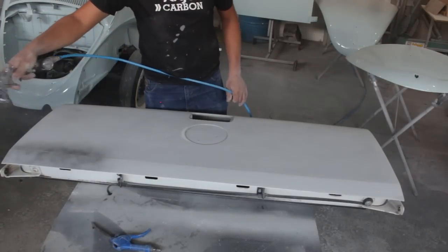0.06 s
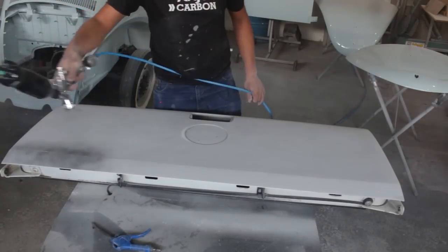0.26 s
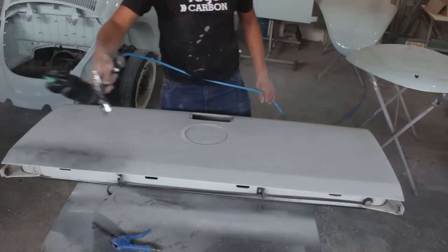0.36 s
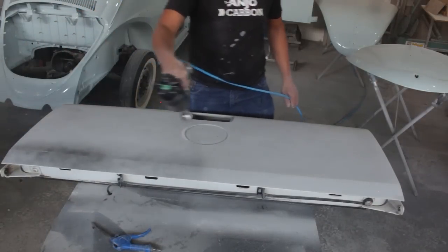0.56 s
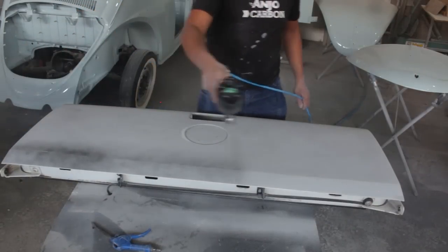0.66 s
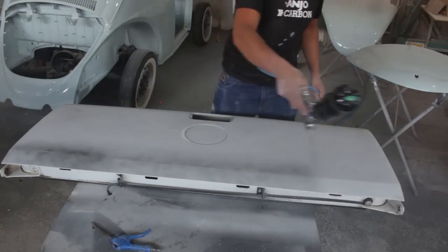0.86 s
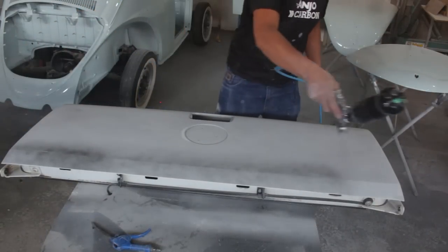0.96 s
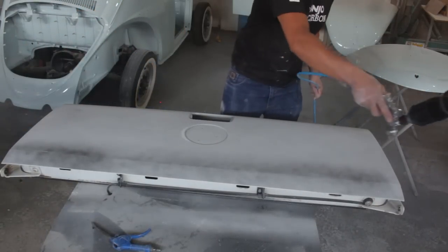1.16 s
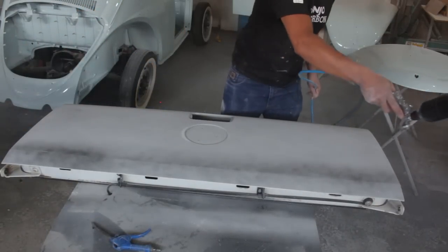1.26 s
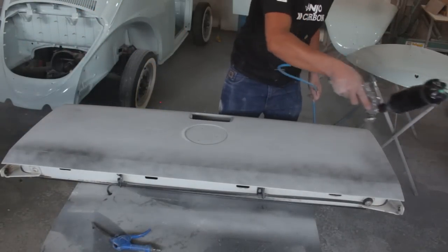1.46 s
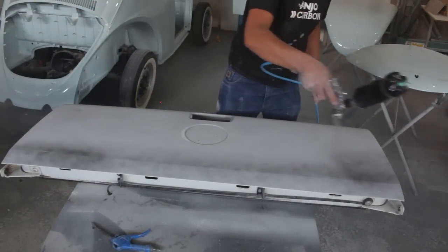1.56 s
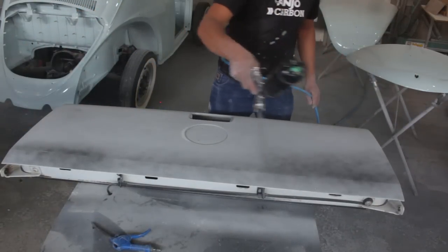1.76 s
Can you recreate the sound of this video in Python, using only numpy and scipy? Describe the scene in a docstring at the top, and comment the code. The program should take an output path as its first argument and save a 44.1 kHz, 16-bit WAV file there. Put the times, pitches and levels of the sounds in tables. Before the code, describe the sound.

A compressed-air spray gun finishes a pass, its hiss fading within the first 0.1 seconds to faint workshop rumble, air and mains hum. At about 0.2 seconds a loud, ragged spit bursts out, settling by 0.35 into bright, steady hiss with a hollow roar off the panel. Around 1.4 the roar dips and the hiss turns brighter, then the return stroke continues to the end. Close, mono, short room reverberation.

```python
"""A compressed-air spray gun in a body shop, in mono, over a faint bed of rumble, air and mains hum.
First the hiss of one pass dies away; then the trigger is pulled with a sharp, ragged spit of air.
The gun hisses across a primed panel and starts back, in three bands of coloured noise with moving levels.
The jet roars hollowly where it strikes the panel: noise in one moving resonance. The panel's echo, a short
moving delay, combs the hiss, and a decaying noise tail gives the gun the workshop's reverberation."""
import sys
import numpy as np
from scipy import signal
from scipy.fft import rfft, irfft, next_fast_len
from scipy.io import wavfile
from scipy.ndimage import uniform_filter1d, map_coordinates

SR = 44100
rng = np.random.default_rng(int(sys.argv[2]) if len(sys.argv) > 2 else 0)


def digitize_waveform(pressure):
    """Quantize a signal to 16-bit integers and store it at the path in sys.argv[1].

    Rows of a 2-D input are taken as channels; values are limited to [-1, 1].
    """
    field = np.atleast_2d(pressure).T
    bounded = np.clip(field, -1, 1)
    quanta = np.round(bounded * 32767).astype(np.int16)
    wavfile.write(sys.argv[1], SR, quanta)


N = 79380  # samples, 1.8 s


def amp(db):
    """Decibels to gain."""
    return 10 ** (np.asarray(db) / 20)


def unit(x):
    """Scale to rms 1."""
    return x / np.sqrt(np.mean(x ** 2) + 1e-20)


def along(points, hz):
    """Read a (frequency, value) table at hz, with frequency on a log axis."""
    point_hz, values = np.transpose(points)
    return np.interp(np.log(hz + 1), np.log(point_hz + 1), values)


def curves(rows, t):
    """Read each column after start_s at times t, in straight lines between the rows."""
    start_s, *columns = np.transpose(rows)
    return [np.interp(t, start_s, column) for column in columns]


def wobble(rate_hz):
    """A smooth random curve through rate_hz random knots a second."""
    knots = rng.standard_normal(4096)
    return map_coordinates(knots, [np.arange(N) * rate_hz / SR], mode="wrap")


def filtered(x, response):
    """Multiply the spectrum of x by a gain that depends on frequency."""
    size = next_fast_len(N + SR // 2)  # padded so that the end does not wrap into the start
    spectrum = rfft(x, size) * response(np.fft.rfftfreq(size, 1 / SR))
    return irfft(spectrum, size)[..., :N]


PATCHY_DB = 0.63  # rms gain variation of the patches


def rush(spectrum):
    """Rushing air: noise of rms 1, coloured by a spectrum, with faint patches of random gain."""
    z = signal.stft(rng.standard_normal(N), nperseg=512)[2]
    patches = uniform_filter1d(rng.standard_normal(z.shape), size=5, axis=0)  # smooth over frequency
    patches = uniform_filter1d(patches, size=14, axis=1)  # then over time
    patchy_noise = signal.istft(z * amp(PATCHY_DB * unit(patches)), nperseg=512)[1][:N]
    return unit(filtered(patchy_noise, lambda hz: amp(along(spectrum, hz))))


# Colour of the background rumble and air: freq_hz, density_db (dB per Hz, relative)
SHOP_SPECTRUM = [(20, -10), (45, 2.5), (70, -0.5), (140, -3.5), (200, -11.5), (500, -15.5), (1500, -7.5),
                 (4000, -9), (9000, -8.5), (12000, -15), (16000, -36)]
SHOP_DB = -44
# Mains hum partials: pitch_hz, level_db (rms, before the trim)
HUM_PARTIALS = [(59.2, -75), (236.9, -69.5), (296.1, -70), (360.7, -69)]
HUM_TRIM_DB = 0.5


def shop(t):
    """Background bed: steady coloured noise under steady sine partials of mains hum."""
    hum = 0
    for pitch_hz, level_db in HUM_PARTIALS:
        sine = np.sin(2 * np.pi * (pitch_hz * t + rng.random()))
        hum = hum + amp(level_db + HUM_TRIM_DB) * np.sqrt(2) * sine  # sqrt(2) turns rms into peak
    return hum + amp(SHOP_DB) * rush(SHOP_SPECTRUM)


# Reverberation time of the workshop: freq_hz, t60_s (time to fall by 60 dB)
ROOM_T60 = [(200, .45), (2000, 0.81), (6000, 0.68), (10000, 0.22), (15000, 0.43)]
ROOM_DELAY_S = .008


def room(x):
    """The workshop's reverberation: a noise tail, each frequency dying away at its own rate."""
    hz, tail_s, z = signal.stft(rng.standard_normal(SR // 2), SR, nperseg=256)
    t60_s = along(ROOM_T60, hz)[:, None]
    tail = signal.istft(z * amp(-60 * tail_s / t60_s), SR, nperseg=256)[1]
    tail = tail / np.linalg.norm(tail)
    delayed = np.pad(x, (int(ROOM_DELAY_S * SR), 0))
    return signal.fftconvolve(delayed, tail)[:N]


# Colour of the pass that is just ending: freq_hz, density_db (dB per Hz, relative)
LAST_PASS_SPECTRUM = [(200, -24), (800, -18), (2000, -7), (5500, -4.5), (8300, 4.5), (9900, 4.5),
                      (11300, -1.5), (14300, -1), (15400, -14), (16000, -22)]
LAST_PASS_DB, RELEASE_S, RELEASE_DB_PER_S = -26, 0.0069, 216


def last_pass(t):
    """The hiss falls away at a steady dB rate as the trigger is let go."""
    fall_db = RELEASE_DB_PER_S * np.maximum(t - RELEASE_S, 0)
    return amp(LAST_PASS_DB - fall_db) * rush(LAST_PASS_SPECTRUM)


TRIGGER_S, OPEN_S = 0.2068, .016  # when the valve starts to open, and how long it takes


def valve(t):
    """How far the air valve is open, 0-1, as a squared ramp from the trigger pull."""
    return np.clip((t - TRIGGER_S) / OPEN_S, 0, 1) ** 2


# Colour of the spit of air: freq_hz, density_db (dB per Hz, relative)
SPIT_SPECTRUM = [(60, -33.5), (110, -30), (145, -13.5), (200, -34), (600, -28), (1300, -24), (2300, -12),
                 (2900, -16), (3550, -25), (4500, -16.5), (5300, -15), (6400, -3.5), (9200, 0),
                 (10600, -0.5), (11400, -5.5), (12900, -6), (13800, -17), (14800, -4.5), (16000, -24)]
SPIT_DB, SPIT_HOLD_S, SPIT_DB_PER_S = -8, 0.0064, 317  # stored hose pressure escapes
SPIT_ROUGH_DB, SPIT_FLUTTER_HZ = -0.4, 446.5  # depth and knot rate of the ragged level


def spit(t):
    """A ragged blast as the valve opens, dying at a steady dB rate as the hose pressure drops."""
    age_s = np.maximum(t - TRIGGER_S - OPEN_S - SPIT_HOLD_S, 0)
    ragged_db = SPIT_ROUGH_DB * wobble(SPIT_FLUTTER_HZ)
    level_db = SPIT_DB - SPIT_DB_PER_S * age_s + ragged_db
    return valve(t) * amp(level_db) * rush(SPIT_SPECTRUM)


# The jet striking the panel, weak beyond its ends: start_s, level_db, resonance_hz
IMPACT_PATH = [(.25, -45, 1900), (.41, -40, 1840), (.46, -36, 1710), (.55, -35.5, 1620), (.8, -35.5, 1640),
               (.9, -37.5, 1690), (1.12, -37, 1610), (1.29, -35, 1750), (1.37, -39.5, 1850),
               (1.42, -58, 1900), (1.475, -43.5, 1800), (1.51, -35.5, 1540), (1.57, -37, 1360),
               (1.66, -37, 1300), (1.8, -40.5, 1400)]
IMPACT_Q, IMPACT_SKIRT = 2.7, 1.38  # a skirt above 1 falls more steeply than a simple resonance


def impact(t):
    """Air striking the panel: noise in one broad resonance that moves with the gun."""
    hz, frames_s, z = signal.stft(rng.standard_normal(N), SR, nperseg=512)
    resonance_hz = curves(IMPACT_PATH, frames_s)[1]
    ratio = (hz[:, None] + 1) / resonance_hz
    gain = (1 + (IMPACT_Q * (ratio - 1 / ratio)) ** 2) ** (-IMPACT_SKIRT / 2)
    roar = unit(signal.istft(z * gain, nperseg=512)[1][:N])
    level_db = curves(IMPACT_PATH, t)[0] + 1.3 * wobble(35.16)  # uneven roar
    return valve(t) * amp(level_db) * roar


# Band levels along the stroke, before the trims: start_s, hiss_db, middle_db, treble_db
STROKE_LEVELS = [(0.33, -24.5, -33.5, -35.5), (0.338, -26, -35.5, -35.5), (0.66, -27.5, -38, -42),
                 (1.016, -27.5, -36.5, -37.5), (1.3, -32.5, -34.5, -35), (1.426, -30.5, -31, -31),
                 (1.542, -27.5, -35.5, -36), (1.59, -29.5, -35, -41), (1.692, -30.5, -36.5, -38.5),
                 (1.8, -30.5, -36.5, -37)]
HISS_TRIM_DB, MIDDLE_TRIM_DB, FIZZ_TRIM_DB = -0.5, -1, 0.5
# Colours of the hiss, the middle and the treble fizz: freq_hz, density_db (dB per Hz, relative)
HISS_SPECTRUM = [(3000, -31.5), (5500, -10.5), (6400, -6), (7300, -2.5), (8700, 1), (10000, -3.5),
                 (11200, -13.5), (12500, -17), (16000, -24)]
MIDDLE_SPECTRUM = [(200, -29.5), (550, -11), (1000, -9), (2300, 1.5), (3400, 0.5), (4500, 3.5),
                   (5600, -3.5), (7500, -36), (12000, -38)]
FIZZ_SPECTRUM = [(8000, -27), (10500, 2), (11700, 0.5), (13000, 0), (14600, -5.5), (15400, -17),
                 (16000, -16)]
# The panel's echo, later as the gun lifts: start_s, delay_ms
ECHO_PATH = [(.35, .715), (.75, 0.75), (1.0, 0.66), (1.27, 0.64), (1.33, 0.68), (1.45, 0.677), (1.56, 0.76),
             (1.8, 0.8)]
ECHO_GAIN = 0.15
TURBULENCE_DB = 0.23  # depth of the random level wobble


def jet(t):
    """The nozzle's hiss, heard directly and once more off the panel, so that the two comb."""
    hiss_db, middle_db, fizz_db = curves(STROKE_LEVELS, t)
    hiss = amp(hiss_db + HISS_TRIM_DB) * rush(HISS_SPECTRUM)
    middle = amp(middle_db + MIDDLE_TRIM_DB) * rush(MIDDLE_SPECTRUM)
    fizz = amp(fizz_db + FIZZ_TRIM_DB) * rush(FIZZ_SPECTRUM)
    air = (hiss + middle + fizz) * valve(t) * amp(TURBULENCE_DB * wobble(40.6))
    delay_ms = curves(ECHO_PATH, t)[0]
    echo = map_coordinates(air, [(t - delay_ms / 1000) * SR], order=5)  # read between samples
    return air + ECHO_GAIN * echo


ROOM_DB = -13.5  # reverberation gain against the direct gun


def scene():
    """The gun in the workshop, alike in both channels."""
    t = np.arange(N) / SR
    gun = last_pass(t) + spit(t) + impact(t) + jet(t)
    mono = shop(t) + amp(ROOM_DB) * room(gun) + gun
    return np.array([mono, mono])


TOP_HZ = 15950


def record(dry):
    """Clip at full scale, then remove everything from TOP_HZ upwards."""
    return filtered(np.clip(dry, -1, 1), lambda hz: hz < TOP_HZ)


dry = scene()
out = record(dry)
digitize_waveform(out)
```